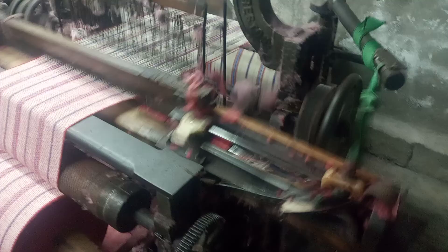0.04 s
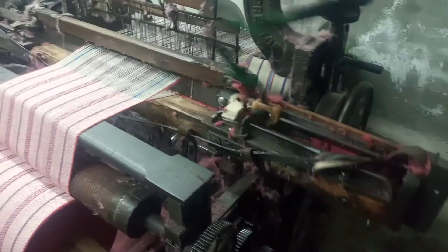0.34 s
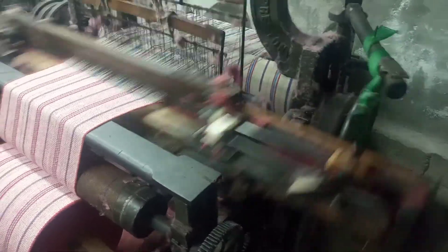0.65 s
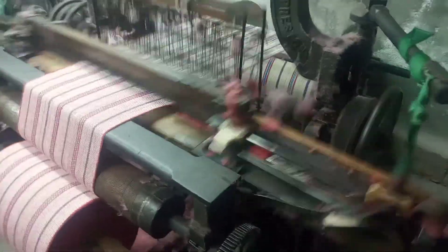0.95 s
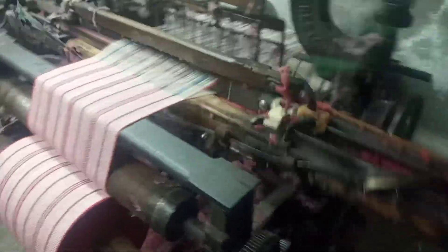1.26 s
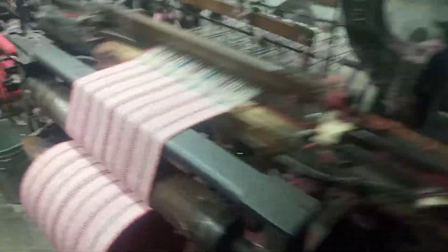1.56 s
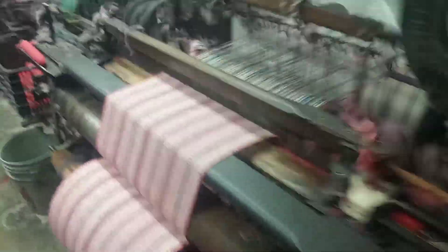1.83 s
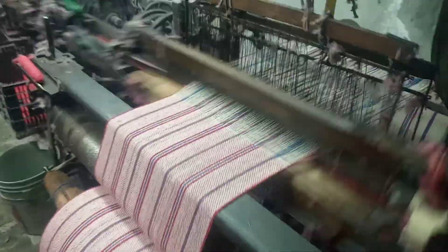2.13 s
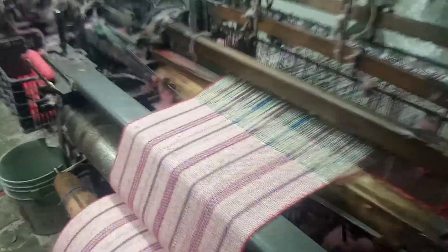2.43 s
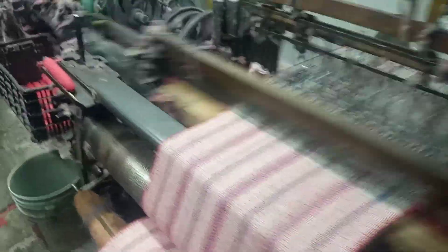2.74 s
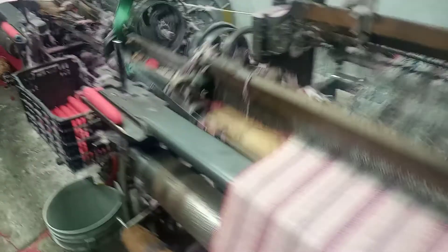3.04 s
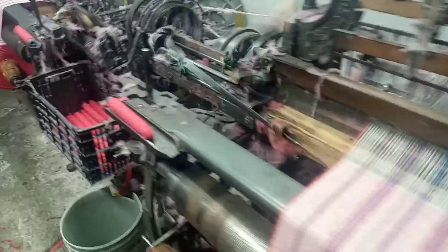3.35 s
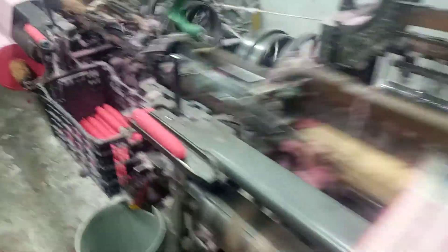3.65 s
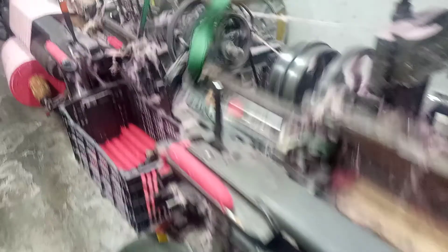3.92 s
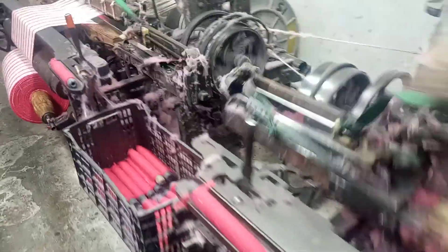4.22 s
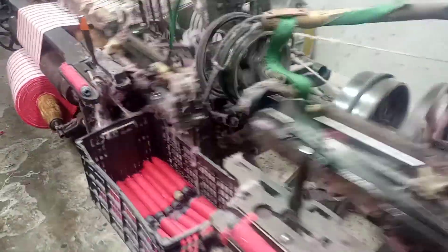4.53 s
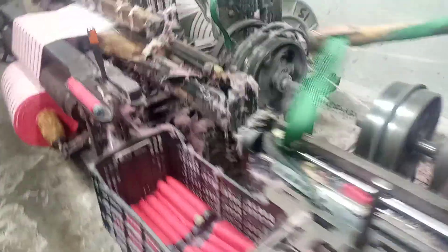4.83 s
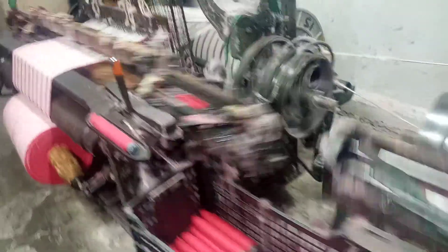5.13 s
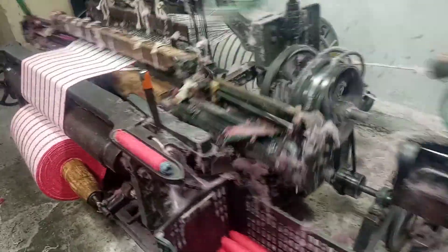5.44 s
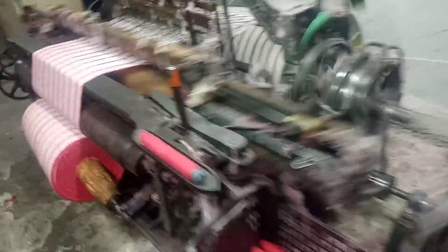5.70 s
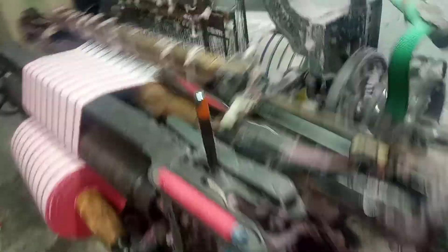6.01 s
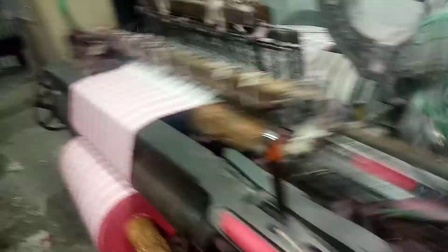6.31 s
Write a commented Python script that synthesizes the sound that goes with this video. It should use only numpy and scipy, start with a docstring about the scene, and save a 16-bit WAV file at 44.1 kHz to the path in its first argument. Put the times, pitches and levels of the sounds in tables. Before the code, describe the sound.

After a brief silence, the loud din of a weaving workshop fades in quickly. Three old shuttle looms run close by, out of step, each striking a little over twice a second. Every blow is a hard, short clank that rattles the iron frame and jingles loose steel. Farther looms merge into dense clatter above a low rumble. The handheld stereo microphones sound louder, brighter and slightly overloaded on the left.

```python
"""Three old shuttle looms at close range in a hard-walled workshop, on a handheld stereo pair.
After 0.4 s the microphones fade in on looms clattering far back and the drive rumbling in the floor.
Up close the three run out of step, each throwing its shuttle out and back: every blow cracks and rattles
the loose iron frame, and narrow treble resonances flare. The left microphone faces the machines and
overloads. As the pair drifts towards the other two, the first loom slowly grows fainter."""
import sys
import numpy as np
from scipy import signal
from scipy.fft import rfft, irfft, next_fast_len
from scipy.io import wavfile
from scipy.ndimage import uniform_filter1d, minimum_filter1d, map_coordinates

SR = 44100
rng = np.random.default_rng(int(sys.argv[2]) if len(sys.argv) > 2 else 0)


def dump(signal):
    """Clip the signal to [-1, 1] and save it as 16-bit WAV at the path in sys.argv[1]."""
    limited = np.clip(np.atleast_2d(signal).T, -1, 1)
    pcm = np.round(limited * 32767).astype(np.int16)
    wavfile.write(sys.argv[1], SR, pcm)


N = 285327

# Levels in the tables are relative. Spectrum of each layer: freq_hz, level_db
FLOOR_SPECTRUM = [(25, -30), (62, -31), (83, -8), (98, -13), (122, -1), (160, -3), (200, -4.5), (300, -5.5),
                  (450, -16), (900, -46.5)]
FAR_SPECTRUM = [(100, -20.5), (300, -3), (550, -5), (900, 2), (1400, 2), (2500, -0.5), (4100, -3.5),
                (5200, -11), (6500, -20.5), (8000, -30.5), (15500, -61)]
FRAME_SPECTRUM = [(100, -18), (300, -4.5), (550, -7), (900, -0.5), (1400, 0.5), (2500, 0), (4100, -1),
                  (5200, -9.5), (6500, -15), (8000, -27.5), (15500, -53)]
JINGLE_SPECTRUM = [(3000, -31), (5000, 0), (5800, -1), (6250, -2.5), (6480, 1.5), (6750, -5), (7200, -7.5),
                   (7900, -17.5), (10000, -50), (15500, -57)]
RING_SPECTRUM = [(5000, -30), (7800, 10), (9500, -17), (11500, -30), (13600, -8), (14500, 9), (15500, 4)]
SLAM_SPECTRUM = [(100, -16), (400, -4), (900, 2), (1600, 6), (4000, 3.5), (6000, -3.5), (8000, -27.5),
                 (15500, -18.5)]
# resonances of the iron frame: pitch_hz, width_hz, level_db
IRON_MODES = [(906, 110, -3.5), (1172, 13, -1), (1496, 51, -3.5), (2046, 13, 1), (2710, 38, -8),
              (4110, 98, -10)]
# narrow high treble resonances that flare on each loud blow: pitch_hz, width_hz, level_db
TREBLE_MODES = [(7900, 70, -4), (8686, 46, 5), (9370, 90, 0), (10310, 57, 2), (11000, 74, -2),
                (12030, 77, -1), (12690, 84, -1), (13300, 150, -5), (13920, 60, 0), (14570, 260, 2),
                (15300, 300, 1)]
# clatter from the back of the workshop: time_s, level_db
FAR_LEVELS = [(0.62, -13), (0.68, -18), (0.88, -14), (1.64, -15), (1.76, -13), (2.51, -15), (2.92, -14.5),
              (3.08, -15.5), (3.34, -17), (3.45, -14), (4.02, -14.5), (4.17, -14), (4.58, -13),
              (5.36, -13.5), (5.54, -19), (5.75, -14), (5.85, -14.5), (6.47, -15.5)]
# single parts ringing out above the din: start_s, pitch_hz, level_db, t60_s
PART_PINGS = [(.632, 4160, -29, 0.77), (.813, 3740, -15.5, 0.16), (.84, 1210, -20.5, 0.16),
              (1.486, 4150, -24, 0.28), (1.67, 6470, -8, 0.15), (1.686, 1540, -10, 0.099),
              (1.692, 958, -20, .14), (1.807, 2310, -12.5, 0.11), (2.535, 1027, -19, .088),
              (4.635, 981, -20, 0.11), (4.86, 2424, -16.5, 0.097), (5.49, 1390, -16, 0.15)]
# One cycle of each near loom: cycle_fraction, frame_db, jingle_db, ring_db, slam_db
FIRST_CYCLE = [(-.064, -23, -17.5, -23, -43), (0, -15, -7, -10.5, -8), (.178, -20.5, -12.5, -17.5, -14),
               (.411, -23.5, -18.5, -22, -28), (.474, -21, -9.5, -15, -9), (.654, -14.5, -8.5, -13, -11.5)]  # picking stick taken up, throw, landing; out, then back
SECOND_CYCLE = [(0, -15, -5, -12.5, -7), (0.333, -32.5, -45, -32.5, -28), (.5, -15.5, -8, -20, -15),
                (.838, -23.5, -8.5, -21, -11)]  # home landing, throw, far landing, throw back
THIRD_CYCLE = [(0, -13, -3, -13, -7), (.5, -15, -13.5, -24.5, -15)]  # home landing, far landing
# looms two and three, slower and uneven on their belts, land at home and in the far box by turns:
# start_s, strength_db, treble_boost_db
SECOND_PASSES = [(.092, -1, -2), (.504, -1, -2), (.951, -2.5, -1), (1.368, 0.5, 3), (1.806, -3, 3),
                 (2.225, -4, 0), (2.673, -1.5, -1), (3.1, -2.5, -3), (3.553, -2, 1), (3.968, -2, 4.5),
                 (4.433, -2, 0), (4.85, -4.5, -3.5), (5.307, -2.5, -3), (5.731, 0, -5.5), (6.158, 1, -3.5)]
THIRD_PASSES = [(.678, -3, -17), (1.11, -3, -11), (1.555, -2.5, -16), (1.953, -2, 6), (2.396, -1, -1),
                (2.828, 3, -6), (3.276, 3, -3.5), (3.715, -1.5, 1), (4.164, -1, -10), (4.6, -1, 7),
                (5.035, -0.5, 1.5), (5.451, -0.5, 5), (5.888, 2.5, 0), (6.296, -0.5, 8)]
# harder hits on some strokes, plus a few stray knocks: start_s, frame_db, jingle_db, ring_db, slam_db
EXTRA_ACCENTS = [(1.887, -13, -15, -21, -28), (2.535, -29, -14, -24, -3.5), (3.005, -18.5, -9, -18, -24),
                 (4.268, -18, -18, -18, -14), (4.656, -25, -19, -21, -12), (5.223, -16.5, -8, -17, -9)]
# how alike the room sounds at the two microphones: freq_hz, coherence_ratio
ROOM_COHERENCE = [(30, 0.2), (70, 1), (220, 0.71), (500, 0.27), (1200, 0), (8000, 0)]
# how much more the left microphone takes in: freq_hz, gain_db
LEFT_MIC_GAIN = [(30, -4), (90, 2), (300, 3.5), (800, -0.5), (1400, 3), (2500, 6), (4000, 6), (5200, 11.5),
                 (6500, 22), (8000, 21.5), (15500, 19.5)]
# the microphones fade in: time_s, gain_db
FADE_IN = [(.41, -82), (.418, -23), (.45, -11), (.5, -5.5), (.6, -0.5), (.68, 4.5)]


def amp(db):
    """Decibels to gain."""
    return 10 ** (np.asarray(db) / 20)


def unit(x):
    """Scale to rms 1."""
    return x / np.sqrt(np.mean(x ** 2) + 1e-20)


def along(points, hz):
    """Read (freq_hz, value) points at hz, on a log frequency axis."""
    freqs, values = np.transpose(points)
    return np.interp(np.log(hz + 1), np.log(freqs + 1), values)


def curve(points):
    """Join (time_s, value) points into one value per sample."""
    return np.interp(np.arange(N) / SR, *np.transpose(points))


def wobble(rate_hz):
    """A smooth random curve with rate_hz knots a second."""
    knots = rng.standard_normal(int(N * rate_hz / SR) + 4)
    return map_coordinates(knots, [np.arange(N) * rate_hz / SR])


def filtered(x, response):
    """Filter x by a complex response of frequency."""
    n = x.shape[-1]
    padded = next_fast_len(n + 4096)
    return irfft(rfft(x, padded) * response(np.fft.rfftfreq(padded, 1 / SR)), padded)[..., :n]


def body(x, spectrum, modes=(), modes_db=0):
    """Pass x through a broad colour with resonances on it, at unit power gain for white noise."""
    def response(f):
        peaks = sum(amp(db + modes_db) * 1j * f * width / (hz * hz - f * f + 1j * f * width)
                    for hz, width, db in modes)
        gain = amp(along(spectrum, f)) + peaks
        return gain / np.sqrt(np.mean(abs(gain) ** 2))
    return filtered(x, response)


def tinted(x, depth_db, step_hz):
    """Give x chance peaks and valleys, as striking another spot of a machine does."""
    knots = rng.standard_normal(512)
    return filtered(x, lambda f: unit(amp(depth_db * np.interp(f / step_hz, np.arange(512), knots))))


def room_noise():
    """White room noise at the two microphones: alike in the bass, unrelated in the treble."""
    def mid_side_gains(f):
        angle = np.arccos(np.clip(along(ROOM_COHERENCE, f), -1, 1)) / 2
        return np.array([np.cos(angle), np.sin(angle)])
    mid, side = filtered(rng.standard_normal((2, N)), mid_side_gains)
    return np.array([mid + side, mid - side])


def contacts(rate_hz, life_s, spread_db):
    """Envelope, rms 1, of loose parts touching at random, each touch dying away over life_s."""
    touches = rng.random(N) < rate_hz / SR
    energy = touches * amp(spread_db * np.clip(rng.standard_normal(N), -2, 2)) ** 2
    return unit(np.sqrt(signal.lfilter([1], [1, -np.exp(-2 / (life_s * SR))], energy)))


def bursts(starts, levels_db, t60_s, attack_s, tint_db, tint_hz):
    """A decaying burst of room noise at each blow, each with its own colour."""
    out, t = np.zeros((2, N + SR)), np.arange(SR * 2 // 5) / SR
    envelope = amp(-60 * t / t60_s) * (1 - np.exp(-t / attack_s))
    room = np.tile(room_noise(), 2)
    for start_s, db in zip(starts, levels_db):
        noise = room[:, rng.integers(N):][:, :len(t)]
        out[:, round(start_s * SR):][:, :len(t)] += amp(db) * envelope * tinted(noise, tint_db, tint_hz)
    return out[:, :N]


def drive(thump_db=-34, drone_db=-49.5, drone_hz=83.3):
    """Underfoot: cranks and belts shake the floor in uneven thumps; the motors drone beneath them."""
    thumps = amp(thump_db + 1.6 * wobble(25)) * body(room_noise(), FLOOR_SPECTRUM)
    phase = 2 * np.pi * np.cumsum(drone_hz + 3 * wobble(8)) / SR
    return thumps + np.sin(phase) * amp(drone_db + 1.4 * wobble(10))


def far_looms(clatter_db=-8, jingle_db=-24.5):
    """Far back: the other looms merge into a dense clatter with a jingle of steel on top."""
    level_db = curve(FAR_LEVELS)
    clatter = room_noise() * contacts(rate_hz=420, life_s=0.04, spread_db=5)
    jingle = room_noise() * contacts(rate_hz=280, life_s=0.022, spread_db=1)
    return (amp(level_db + clatter_db) * body(clatter, FAR_SPECTRUM, IRON_MODES, modes_db=-4.5)
            + amp(level_db + jingle_db) * body(jingle, JINGLE_SPECTRUM))


def pings(attack_s=0.0019):
    """Above the din: rods, springs and wooden arms ring at one pitch each, blurred by their rattling."""
    out, t = np.zeros((2, N + SR)), np.arange(SR // 3) / SR
    for start_s, hz, db, t60_s in PART_PINGS:
        width_hz = 16 / t60_s  # the shorter the ring, the wider its line
        drift = np.cumsum(rng.standard_normal((2, len(t))), axis=1) * np.sqrt(2 * np.pi * width_hz / SR)
        envelope = amp(-60 * t / t60_s) * (1 - np.exp(-t / attack_s))
        gain = amp(db + 8.5 - along(LEFT_MIC_GAIN, hz))  # balanced for the left microphone
        out[:, round(start_s * SR):][:, :len(t)] += gain * envelope * np.sin(2 * np.pi * hz * t + drift)
    return out[:, :N]


def loom_blows(passes, cycle):
    """A loom cycles once in two shuttle passes. Rows: start_s, frame_db, jingle_db, ring_db, slam_db."""
    lengths = np.diff([start_s for start_s, _, _ in passes])
    lengths = np.append(lengths, lengths[-2])
    blows = []
    for k, ((start_s, db, boost_db), length_s) in enumerate(zip(passes, lengths)):
        treble_db = db + boost_db
        for cycle_fraction, frame, jingle, ring, slam in cycle:
            direction, pass_fraction = divmod(2 * cycle_fraction, 1)
            if direction % 2 == k % 2:  # even passes go out, odd ones come back
                blow_s = start_s + pass_fraction * length_s
                blows.append((blow_s, frame + db, jingle + treble_db, ring + treble_db, slam + db))
    return blows


def near_blows(throw_s=0.686, cycle_s=0.8495, recede_db_per_s=0.4):
    """Blows of the three near looms; the first keeps strict time and fades as the microphones move on."""
    starts = np.arange(throw_s - cycle_s, N / SR, cycle_s / 2)
    first_passes = [(s, -recede_db_per_s * (s - starts.mean()), 0) for s in starts]
    blows = np.array(loom_blows(first_passes, FIRST_CYCLE) + loom_blows(SECOND_PASSES, SECOND_CYCLE)
                     + loom_blows(THIRD_PASSES, THIRD_CYCLE) + EXTRA_ACCENTS)
    return blows[(blows[:, 0] > 0) & (blows[:, 0] < N / SR)]


def near_rattle(blows):
    """Up close: each blow rattles the frame and jingles loose steel, and the high treble rings."""
    starts, frame_db, jingle_db, ring_db, _ = blows.T
    frame = bursts(starts, frame_db - 0.8, t60_s=0.49, attack_s=0.00091, tint_db=4, tint_hz=201.5)
    frame *= contacts(rate_hz=540, life_s=0.0094, spread_db=1.5)
    jingle = bursts(starts, jingle_db - 21, t60_s=0.4, attack_s=0.00058, tint_db=3.5, tint_hz=195.4)
    jingle *= contacts(rate_hz=300, life_s=0.014, spread_db=1.5)
    ring = bursts(starts, ring_db - 21.5, t60_s=0.29, attack_s=0.001, tint_db=6, tint_hz=260.2)
    ring *= contacts(rate_hz=220, life_s=0.018, spread_db=2.5)
    return (body(frame, FRAME_SPECTRUM, IRON_MODES, modes_db=-4.5)
            + body(jingle, JINGLE_SPECTRUM)
            + body(ring, RING_SPECTRUM, TREBLE_MODES, modes_db=10))


def slams(blows, t60_s=0.085, contact_s=0.0011, contact_gain=0.82):
    """In the foreground: picker and shuttle hit home with a hard, short clank."""
    out, t = np.zeros((2, N + SR)), np.arange(SR // 8) / SR
    # the first contact stands out over the chatter that follows
    envelope = amp(-60 * t / t60_s) * (1 + contact_gain * np.exp(-t / contact_s))
    for start_s, *_, db in blows:
        shared, per_mic = rng.standard_normal(len(t)), rng.standard_normal((2, len(t)))
        clank = tinted(unit(shared + per_mic), depth_db=2, step_hz=239)
        out[:, round(start_s * SR):][:, :len(t)] += amp(db - 6.5) * envelope * clank
    # the shuttle box lies nearer the right microphone
    return body(out[:, :N], SLAM_SPECTRUM) * amp([[-5], [0]])


def scene(left_lag_s=0.00128):
    """All machines at the two microphones; the left hears them louder, brighter and a little later."""
    blows = near_blows()
    din = (near_rattle(blows) + far_looms()) * amp([[0], [-1.6]])
    left, right = din + slams(blows) + pings() + drive()
    left = filtered(left, lambda f: amp(along(LEFT_MIC_GAIN, f)) * np.exp(-2j * np.pi * f * left_lag_s))
    return np.array([left, right])


def limiter(x, ceiling, hold_s):
    """Turn each channel down for about hold_s around peaks over the ceiling."""
    size = int(hold_s * SR)
    needed_gain = np.minimum(1, ceiling / (abs(x) + 1e-9))
    return x * uniform_filter1d(minimum_filter1d(needed_gain, size, axis=1), size, axis=1)


def record(dry, top_hz=15780):
    """The microphone channels fade in, are limited, saturate on remaining peaks and roll off at top_hz."""
    faded = dry * amp(curve(FADE_IN) - 0.76)
    held = limiter(faded, ceiling=1.495, hold_s=0.0023)
    saturated = held / (1 + abs(held) ** 10) ** (1 / 10)
    return filtered(saturated, lambda f: np.clip((top_hz - f) / 120 + 0.5, 0, 1))


dry = scene()
out = record(dry)
dump(out)
```